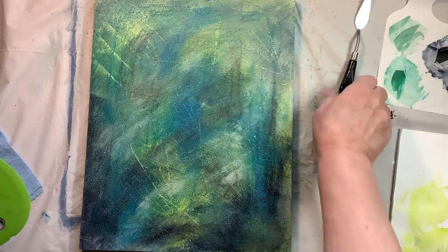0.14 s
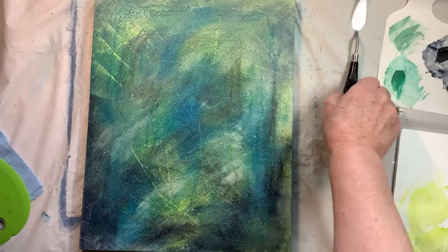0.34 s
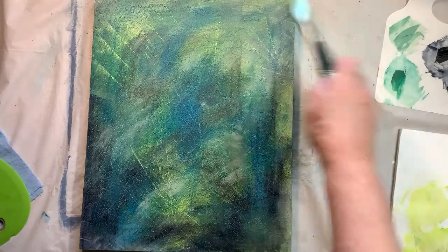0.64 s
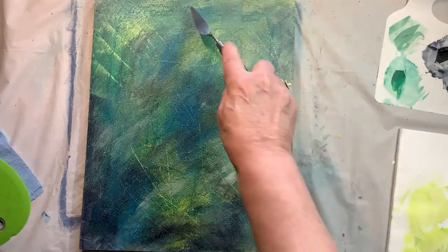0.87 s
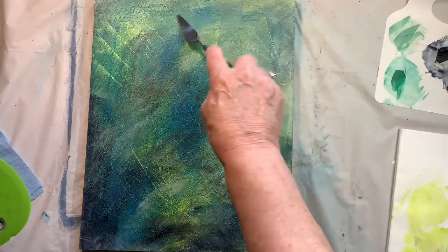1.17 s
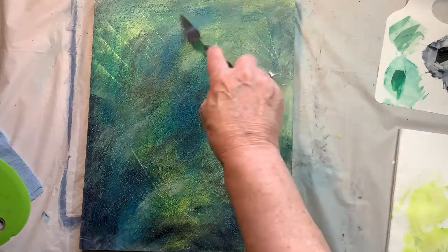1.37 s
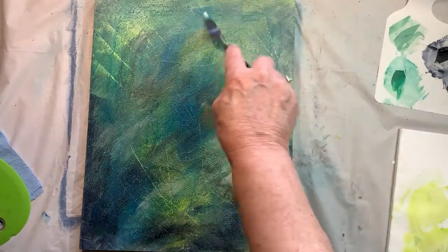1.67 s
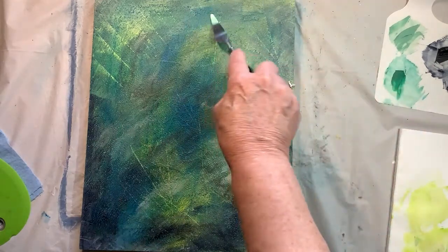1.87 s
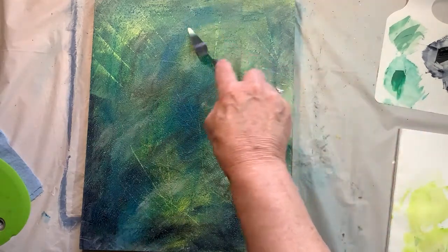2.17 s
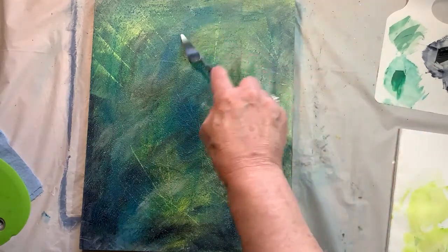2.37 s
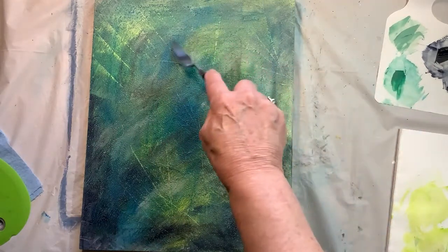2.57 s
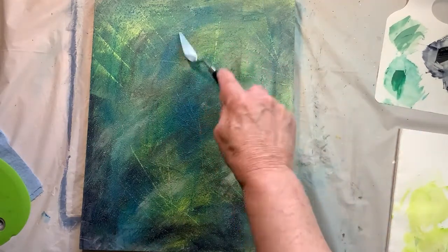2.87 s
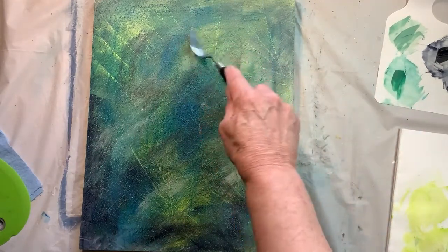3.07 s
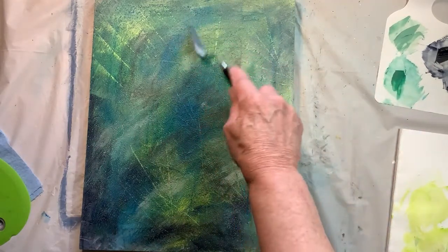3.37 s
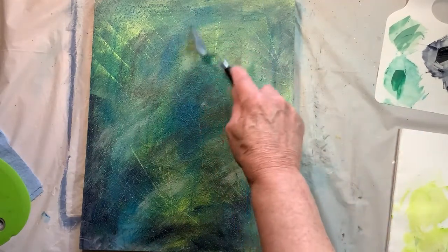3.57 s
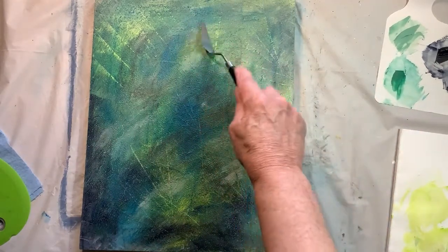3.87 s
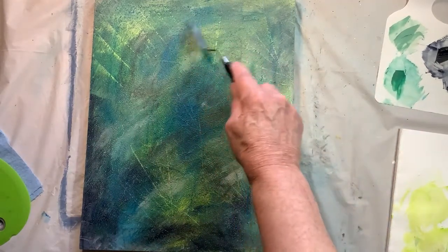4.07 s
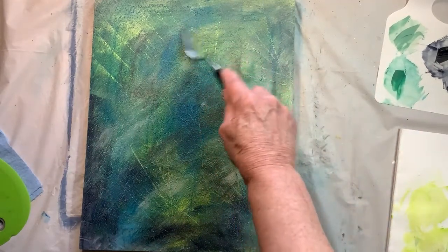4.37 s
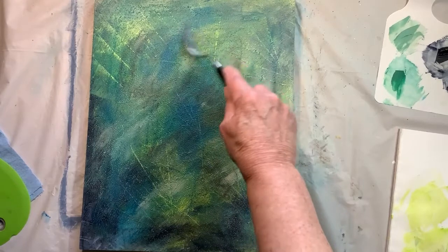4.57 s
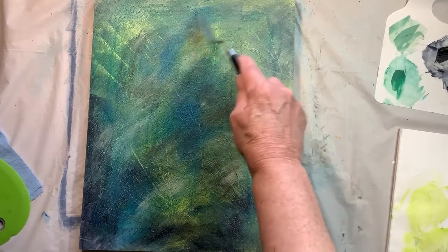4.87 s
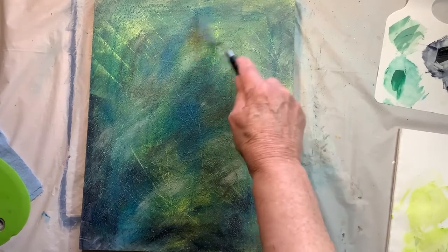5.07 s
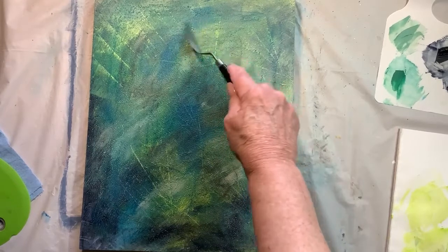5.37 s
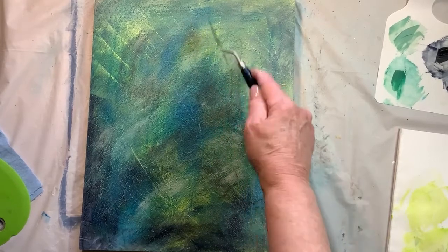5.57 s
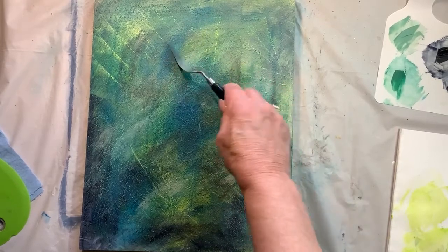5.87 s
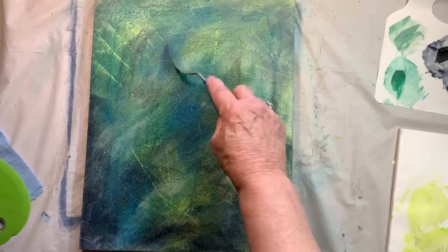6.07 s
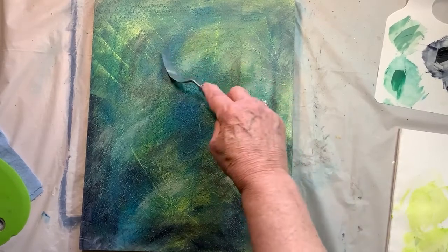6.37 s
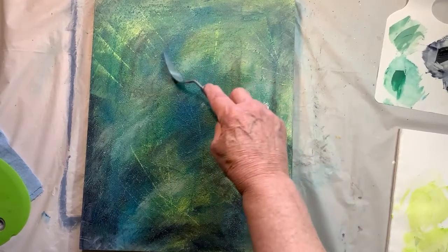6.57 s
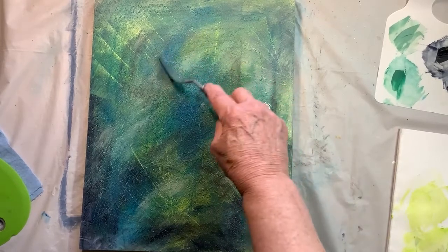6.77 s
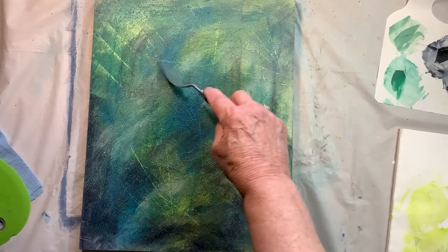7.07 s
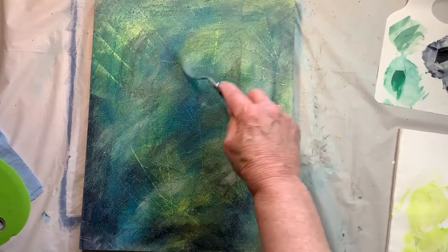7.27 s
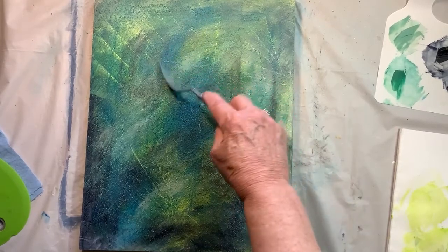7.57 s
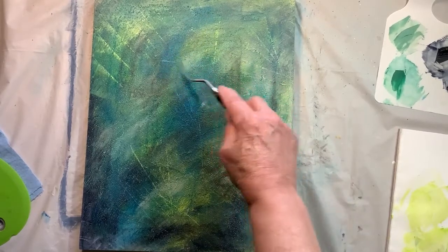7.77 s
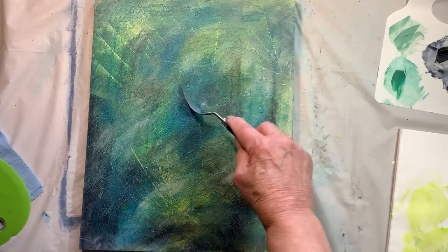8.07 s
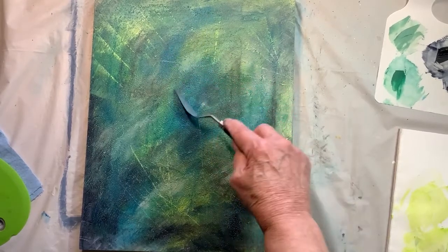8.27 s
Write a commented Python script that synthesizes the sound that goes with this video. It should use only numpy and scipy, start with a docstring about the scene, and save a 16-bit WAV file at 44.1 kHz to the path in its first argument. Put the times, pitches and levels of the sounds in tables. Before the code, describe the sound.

Close to a gritty wooden panel, a thin metal palette knife lands with dull taps and drags in short, dry scrapes. The first strokes are strongest, with woody body and metallic hiss. They gradually soften into brief rubs and tiny ticks, almost vanish after five and a half seconds, then firmer strokes and knocks return. A small quiet room adds short reverb and low ventilation rumble.

```python
"""Palette knife on a wooden panel

A palette knife works thick paint over a gritty wooden panel in a quiet studio.
Many strokes start with a dull tap as the blade lands. Then grit catching on the edge rings the
panel and the blade and makes a fine hiss. Short noise puffs make the paint ticks, wavering tones make
faint squeaks, and shaped noise makes the room tone and the reverb."""
import sys
import numpy as np
from scipy import signal
from scipy.fft import rfft, irfft, next_fast_len
from scipy.io import wavfile
from scipy.ndimage import uniform_filter1d

SR = 44100
rng = np.random.default_rng(int(sys.argv[2]) if len(sys.argv) > 2 else 0)


def wrap_up_sound(samples):
    """Save the sound to the file named by the first command line argument, as 16-bit audio."""
    columns = np.atleast_2d(samples).T
    # keep every value between -1 and 1, then stretch to whole-number steps
    tamed = np.clip(columns, -1, 1)
    steps = np.round(tamed * 32767).astype(np.int16)
    wavfile.write(sys.argv[1], SR, steps)


N = 371763

# the tones at which the panel can ring: f/Hz, width/Hz, level/dB
PANEL_MODES = [(77, 46, -31), (118, 29.5, -26.5), (174, 34, -23), (243, 43.5, -10), (227.5, 47, -11.5),
               (294.1, 33.6, -6), (369.4, 23.8, -1.5), (428.5, 27.4, -6), (514, 85, -8.5), (613.6, 29, -13),
               (699, 41, -11), (820.4, 61, -14), (918, 43, -15.5), (1021, 26, -13.5), (1140, 74, -14),
               (1290, 62, -15), (1512, 230, -13), (1875, 130, -19)]
# blade landing on the panel: t/s, strength/dB, strongest pitch f/Hz,
# deep boom level/dB and bright knock level/dB, both relative to the strength
LANDINGS = [(0.048, -15.5, 167, -45, -16.5), (0.296, -23.5, 169, -29, -16.5), (0.522, -12, 238, -17, -28),
            (0.54, -21, 303, 3, -18), (0.871, -17.5, 231, -49, -22.5), (1.584, -19, 215, -14, -25),
            (2.092, -14, 233, -52, -19.5), (2.49, -27.5, 224, -25, -3.5), (2.808, -27.5, 207, -10, -7.5),
            (3.141, -31, 354, 0, -3), (3.446, -27, 200, -7, -8), (5.239, -23.5, 200, -14.5, -9.5),
            (5.463, -31, 260, -5, -15), (5.497, -34, 143, 4, -23), (7.571, -22.5, 157, -0.5, -27),
            (7.992, -29, 282, 4, -4), (8.119, -21.5, 372, -0.5, -29), (8.384, -21, 393, -1, -20),
            (8.404, -23, 318, -2, -13)]


def from_db(db):
    """Turn decibels into a gain."""
    return 10 ** (np.asarray(db) / 20)


def rms_one(x):
    """Scale a signal to an rms (average strength) of 1."""
    return x / np.sqrt(np.mean(x ** 2) + 1e-20)


def at_hz(points, hz):
    """Read a table between its points, with frequency on a log axis."""
    points = np.array(points)
    return np.interp(np.log(np.maximum(hz, 1)), np.log(points[:, 0]), points[:, 1])


def drift(rate_hz):
    """Slow random wandering with spread 1: smoothed noise, made at every 40th sample."""
    step = 40
    r = np.exp(-2 * np.pi * step * rate_hz / SR)
    noise = rng.standard_normal(N // step + 2002)
    slow = signal.lfilter([1], [1, -2 * r, r * r], noise)[2000:]    # skip the filter's start
    return np.interp(np.arange(N) / step, np.arange(len(slow)), rms_one(slow))


def ring(drive, hz, width_hz):
    """A resonance: a unit click sets a dying sine of height 1 ringing; a wider one dies sooner."""
    r = np.exp(-np.pi * width_hz / SR)
    w = 2 * np.pi * hz / SR
    return signal.lfilter([0, np.sin(w)], [1, -2 * r * np.cos(w), r * r], drive + 1e-18)


def band_pass(x, low_hz, high_hz):
    """Keep the sound between two frequencies."""
    return signal.sosfilt(signal.butter(2, [low_hz, high_hz], "band", fs=SR, output="sos"), x)


def coloured(x, spectrum):
    """Give a white signal a spectrum, with rms 1."""
    size = next_fast_len(N)
    hz = np.arange(size // 2 + 1) * SR / size
    gain = from_db(at_hz(spectrum, hz))
    return rms_one(irfft(rfft(x, size) * gain, size)[:N])


def room_tone():
    """Ventilation rumble and microphone hiss: shaped noise, wavering a little in level."""
    # spectrum of the quiet room: f/Hz, level per Hz/dB
    tone_spectrum = [(15, -31), (25, 7), (92, -1), (223, 0), (317, -5), (363, -9.5), (677, -13),
                     (1190, -26.5), (1440, -21), (1700, -27), (2000, -29.5), (4490, -33), (5880, -32),
                     (11000, -31), (16000, -34.5)]
    level = from_db(-58.5 + 0.11 * drift(19))
    return level * coloured(rng.standard_normal(N), tone_spectrum)


def grains(per_s, spread_db):
    """Grit as random clicks of uneven size and sign, with rms 1."""
    size_db = spread_db * np.minimum(rng.exponential(1, N), 4)
    clicks = from_db(size_db) * rng.choice([-1, 1], N)
    return rms_one(clicks * (rng.random(N) < per_s / SR))


def stroke_gains(ease_s):
    """Gains of the four layers: the edge digs in, drags while pressure and angle change, and lifts off."""
    # strokes of the knife: start t/s, rise/s, drag/s, pressure once dug in level/dB,
    # pressure at lift-off level/dB, steepness of the edge as brightness once dug in/dB,
    # the same at lift-off/dB, dryness of the paint as extra hiss/dB
    strokes = [(0.0, 0.0027, 0.046, -50.5, -59.5, 10, 12, 2.5),
               (0.082, 0.032, 0.084, -30.5, -44.5, 0.5, 2, 5), (0.322, 0.033, 0.043, -31, -35, 1, 6, 1.5),
               (0.557, 0.018, 0.042, -31, -38, -1, 11.5, 2), (0.92, 0.071, 0.26, -36, -43, -2, 2, 9.5),
               (1.209, 0.067, 0.059, -36, -46, 3.5, 14.5, 4.5),
               (1.614, 0.031, 0.18, -33, -39, 1.5, 12.5, -0.5), (2.131, 0.024, 0.12, -34.5, -33, 2, 2, -1),
               (2.513, 0.052, 0.072, -36, -38.5, 1.5, 6.5, -1.5),
               (2.854, 0.036, 0.084, -40.5, -34, 3, -5.5, 0),
               (3.169, 0.034, .12, -42, -49.5, -1, 6.5, -1.5), (3.483, .028, 0.099, -43, -47.5, 3.5, 9, -5),
               (3.592, 0.021, 0.01, -40, -46.5, 10, 12.5, -2), (4.03, 0.046, .02, -62.5, -68, 9, 2, 1),
               (4.125, 0.066, 0.017, -44.5, -50, 3.5, 12, 2.5),
               (4.42, 0.019, 0.098, -62, -57, 3.5, -3.5, 10),
               (4.738, 0.031, .075, -45, -46.5, 6.5, 1.5, -2),
               (5.028, 0.028, 0.048, -37.5, -41.5, 1, 10, -3.5),
               (5.263, 0.0086, 0.034, -41.5, -41, 1, 17.5, -1.5),
               (5.5, 0.014, 0.16, -67, -70, -1, -3, 17.5), (6.3, 0.026, 0.024, -61, -69, 3, 11, 9),
               (6.41, 0.012, 0.048, -69, -72, 14, 12, 12.5), (6.735, .016, 0.021, -62, -67.5, 14, 10, 10),
               (6.889, 0.0078, 0.073, -52.5, -67, -4, 0, 8),
               (6.981, 0.0085, 0.016, -53.5, -56.5, 4.5, -7, 20.5),
               (7.19, 0.027, 0.24, -66, -65, 2.5, 9, 5), (7.606, 0.031, 0.073, -48, -40.5, 0, 1, 12.5),
               (7.999, 0.024, 0.092, -34.5, -40.5, -1, 11, 6),
               (8.409, 0.01, 0.009, -28.5, -46.5, -26, -7, 9)]
    # how low panel, upper panel, blade and hiss follow a stroke: level over the pressure/dB,
    # share of the brightness, drop at first contact/dB, sag in mid-drag/dB, fade after lift-off/(dB/s)
    layers = [(0.5, 0, 16, 1, 606), (-9.5, 0.57, 14, 2, 374), (-17, 0.96, 15.5, 2, 416),
              (-27.5, 0.98, 13, 2, 356)]
    steepen_power = 0.86    # how the edge's angle changes along the drag (1 = evenly)
    catch_db, catch_s = [0.47, 3.27, 2.7, 3], 0.025    # the edge catches around lift-off: per layer
    catch_from_db, catch_full_db = -62, -50    # lift-off pressure for no catch and for a full one

    t, gains = np.arange(N) / SR, np.zeros((4, N))
    over_db, share, contact_db, sag_db, fade = np.transpose(layers)[:, :, None]
    for start, rise, drag, bite_db, lift_db, bright_db, bright_lift_db, dry_db in strokes:
        on = (t >= start) & (t < start + rise + drag + 0.1)
        age = t[on] - start
        since_lift = age - rise - drag
        along = np.clip((age - rise) / drag, 0, 1)
        pressure = bite_db + (lift_db - bite_db) * along
        bright = bright_db + (bright_lift_db - bright_db) * along ** steepen_power
        db = pressure + over_db + share * bright
        db -= sag_db * np.sin(np.pi * along)
        db -= contact_db * np.clip(1 - age / rise, 0, 1)
        db -= fade * np.maximum(since_lift, 0)
        grip = np.interp(lift_db, [catch_from_db, catch_full_db], [0, 1])
        db += grip * np.array(catch_db)[:, None] * np.exp(-(since_lift / catch_s) ** 2)
        db[3] += dry_db
        onset = np.minimum(age / 0.0093 + 0.86, 1)
        gains[:, on] = np.maximum(gains[:, on], onset * from_db(db))    # the louder stroke wins
    return uniform_filter1d(gains, max(1, int(ease_s * SR)), axis=1, mode="nearest")


def singing(hz):
    """Lift in dB over time of a mode that lies near a pitch the blade's angle lets sing out."""
    # singing moments: middle t/s, time from middle to either end/s, pitch f/Hz, lift/dB
    sing_moments = [(0.346, 0.043, 5650, 12), (1.112, 0.053, 1020, 17.5), (1.748, .08, 1020, 10),
                    (1.34, .025, 2660, 16), (0.576, 0.039, 5500, 13), (0.986, 0.083, 5510, 17),
                    (0.994, 0.046, 3140, 16), (1.116, 0.25, 2650, 15.5), (1.11, 0.045, 4710, 21),
                    (1.69, 0.086, 5500, 7.5), (2.279, 0.022, 3900, 15), (4.776, 0.056, 4020, 15),
                    (5.312, 0.024, 4710, 14.5), (7.235, .07, 5370, 24), (7.36, 0.056, 5500, 21),
                    (8.114, 0.018, 3530, 23.5)]
    lift = np.zeros(N)
    for middle, half_s, sing_hz, lift_db in sing_moments:
        start, size = int((middle - half_s) * SR), int(2 * half_s * SR)
        nearness = np.exp(-(np.log(hz / sing_hz) / 0.038) ** 2)
        lift[start:start + size] += lift_db * nearness * np.hanning(size)
    return lift


def rubbed(modes, drive, wander_db, wander_hz):
    """A grain pushes each mode either way; each is fed more or less as the contact point travels."""
    out = np.zeros(N)
    for hz, width, db in modes:
        side = rng.choice([-1, 1], N)
        feed = side * from_db(db + singing(hz) + wander_db * drift(wander_hz))
        out += np.sqrt(width) * ring(drive * feed, hz, width)    # keeps wide modes from being too weak
    return out


def scrape():
    """Coarse grit shakes the panel, fine grit the blade; the gains act on the driving force."""
    # tones at which the blade can ring: f/Hz, width/Hz, level/dB
    blade_modes = [(2212, 260, 2.5), (2685, 320, 0), (3170, 180, -4.5), (3570, 110, -7), (3833, 190, -4.5),
                   (4350, 340, -6.5), (4680, 150, -6), (5400, 340, -8), (5600, 300, -3), (6020, 110, -7.5)]
    # spectrum of the edge hiss: f/Hz, level per Hz/dB
    hiss_spectrum = [(880, -30), (1500, -4), (2040, -8), (2660, -10), (4000, -8.5), (5490, -9),
                     (6500, -13.5), (7920, -12.5), (13900, -20), (16000, -24)]
    low, upper, blade, hiss = stroke_gains(ease_s=0.007)
    coarse = grains(1500, spread_db=2.5)
    fine = grains(5000, spread_db=2.5)
    judder = from_db(1.38 * drift(25.2) + 1.0 * drift(92))    # the edge sticks and slips

    low_push, upper_push = coarse * low * judder, coarse * upper * judder
    wood = from_db(-39) * rubbed(PANEL_MODES[1:10], low_push, wander_db=3.0, wander_hz=2.8)
    wood += from_db(-30) * rubbed(PANEL_MODES[10:], upper_push, wander_db=1.0, wander_hz=7.3)
    wood = band_pass(wood, 130, 2200)    # paint cushions the contact

    steel = from_db(-46.5) * rubbed(blade_modes, fine * blade * judder, wander_db=3.5, wander_hz=41)
    steel = band_pass(steel, 1800, 6300)
    return wood + steel + from_db(4) * hiss * judder * coloured(fine, hiss_spectrum)


def studio(x):
    """Diffuse reverb: noise in octave bands, each dying at its own rate, after a soft start."""
    # reverb of the room: f/Hz, time to fall by 60 dB t/s
    decay_times = [(100, 0.88), (260, 0.38), (700, 0.38), (2000, 0.37), (6000, 0.29), (15000, 0.39)]
    t = np.arange(int(0.8 * SR)) / SR
    edges_hz = 40 * 2.0 ** np.arange(10)
    tail = 0
    for low, high in zip(edges_hz, edges_hz[1:]):
        band = band_pass(rng.standard_normal(len(t)), low, high)
        t60 = at_hz(decay_times, np.sqrt(low * high))
        tail = tail + band * from_db(-60 * t / t60)
    tail *= np.clip(t / 0.0038, 0, 1) / np.linalg.norm(tail)
    return signal.fftconvolve(x, tail)[:N]


def taps():
    """A cushioned push rings modes near its own pitch and the lowest ones; a harder part the upper ones."""
    s, strength_db, tap_hz, boom_db, knock_db = np.transpose(LANDINGS)
    at = (s * SR).astype(int)
    soft, hard = np.zeros(N), np.zeros(N)
    luck_db = rng.normal(0, 1.5, (len(at), len(PANEL_MODES)))
    sides = rng.choice([-1, 1], luck_db.shape)    # the landing spot sets which way an upper mode starts
    for k, (hz, width, db) in enumerate(PANEL_MODES):
        level = from_db(strength_db + 0.25 * db + luck_db[:, k])
        near = from_db(-12 * np.log2(hz / tap_hz) ** 2 - 8.5)
        boom = from_db(boom_db - 8) * (k < 2)    # the two lowest modes only
        knock = from_db(knock_db - 14.5) * (k > 7) * sides[:, k]
        soft_clicks, hard_clicks = np.zeros(N), np.zeros(N)
        soft_clicks[at] = level * (near + boom)
        hard_clicks[at] = level * knock
        # neighbouring modes start in opposition
        soft += (-1) ** k * ring(soft_clicks, hz, (0.54 + hz / 1500) * width)
        hard += ring(hard_clicks, hz, 0.61 * width)
    soft = signal.sosfilt(signal.bessel(3, 800, fs=SR, output="sos"), soft)
    return soft + signal.sosfilt(signal.bessel(3, 1700, fs=SR, output="sos"), hard)


def ticks():
    """Paint and grit snap off the edge: each snap is a short puff of noise through a broad resonance."""
    # snaps: t/s, peak level/dB, pitch f/Hz
    snaps = [(0.9934, -37, 1020), (2.228, -58, 1550), (3.761, -54.5, 2100), (4.017, -55.5, 2260),
             (4.153, -55, 1450), (4.685, -51, 1190), (4.985, -56, 2000), (5.6995, -43, 1300),
             (6.3225, -65, 1290), (6.6547, -52, 1070), (6.687, -50.5, 1300), (6.748, -51, 3080),
             (6.8282, -52.5, 2520), (6.901, -59, 1040), (6.9217, -53, 3670), (6.9863, -49, 3820)]
    t60_s = 0.028
    snap_db, snap_hz = -20.5, 2530    # a landing blade also snaps faintly, under its knock
    landing_snaps = [(s, db + knock_db + snap_db, snap_hz) for s, db, _, _, knock_db in LANDINGS]
    snaps = snaps + landing_snaps
    t, out = np.arange(int(0.05 * SR)) / SR, np.zeros(N)
    noises = rng.standard_normal((len(snaps), len(t)))
    for (s, db, hz), noise in zip(snaps, noises):
        puff = noise * from_db(-60 * t / t60_s)
        snap = puff + 0.49 * ring(puff, hz, 0.5 * hz)
        at = int(s * SR)
        out[at:at + len(t)] += (from_db(db) * snap / np.abs(snap).max())[:N - at]
    return out


def squeak():
    """Faint squeaks of the blade: wavering tones with a weaker octave, swelling and fading as they sink."""
    # squeaks: start t/s, length/s, pitch before it bends and sinks f/Hz, top level of the main tone/dB
    squeaks = [(7.21, 0.097, 2780, -79), (7.423, .095, 3150, -69)]
    bend_hz, swell_db = 220, 6    # pitch and level arch: lower by this at both ends
    sink_hz_per_s = 2060    # the pitch also sinks throughout
    t, out = np.arange(N) / SR, np.zeros(N)
    for start, length, top_hz, db in squeaks:
        swell = np.abs(np.sin(np.pi * np.clip((t - start) / length, 0, 1)))
        hz = top_hz - bend_hz * (1 - swell)
        hz = hz - sink_hz_per_s * np.clip(t - start, 0, length) + 40 * drift(61)
        phase = 2 * np.pi * np.cumsum(hz) / SR
        tone = np.sin(phase) + from_db(-19) * np.sin(2 * phase)
        # the root fades both ends to silence
        out += np.sqrt(2 * swell) * from_db(db - swell_db * (1.5 - swell)) * tone
    return out


def scene():
    """Knife and panel, their reverb and the room tone."""
    knife = scrape() + taps() + ticks() + squeak()
    return (knife + from_db(-9) * studio(knife) + room_tone())[None]


def record(dry):
    """The microphone drops the deepest bass; the top is cut."""
    x = signal.sosfilt(signal.butter(8, 41, "high", fs=SR, output="sos"), dry)
    return signal.sosfilt(signal.cheby2(18, 60, 16150, fs=SR, output="sos"), x)    # 60 dB down from 16150 Hz


dry = scene()
out = record(dry)
wrap_up_sound(out)
```